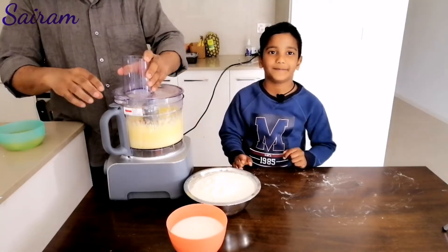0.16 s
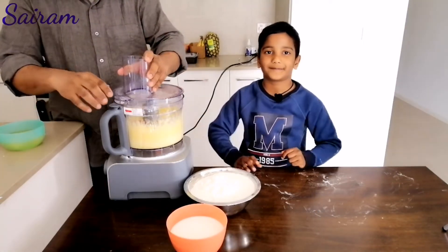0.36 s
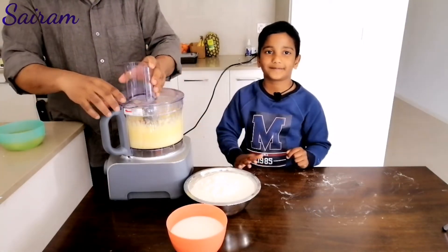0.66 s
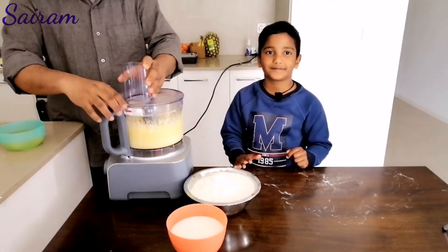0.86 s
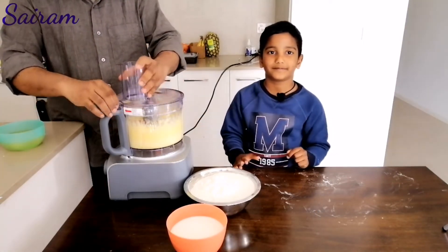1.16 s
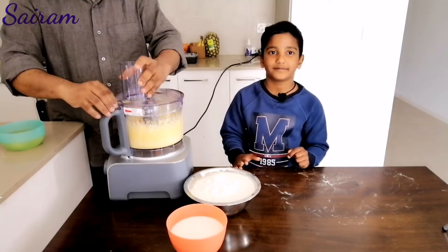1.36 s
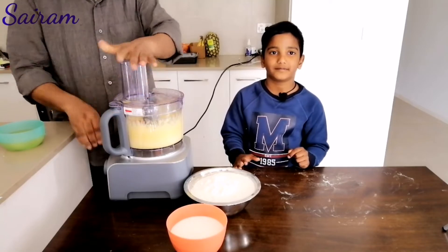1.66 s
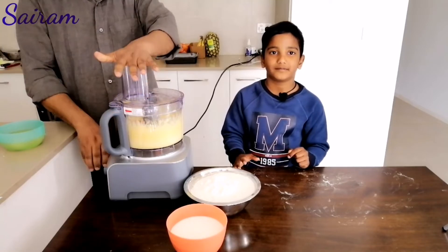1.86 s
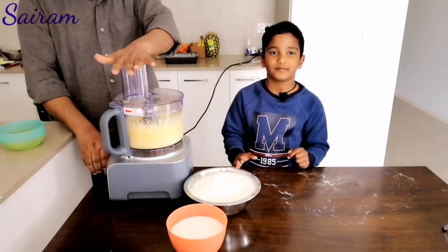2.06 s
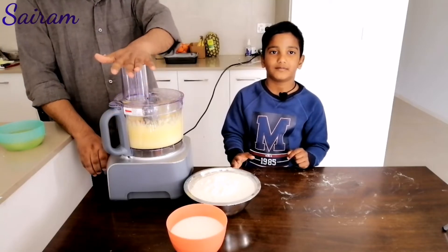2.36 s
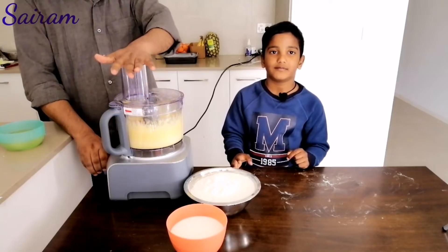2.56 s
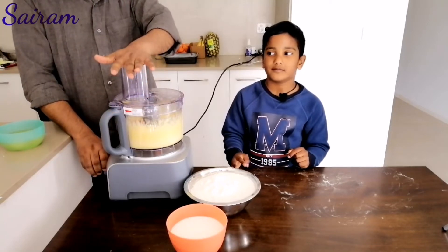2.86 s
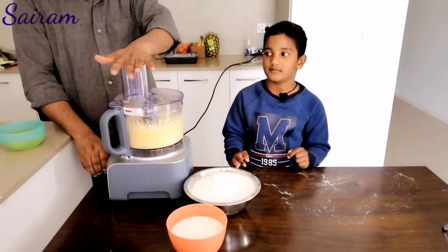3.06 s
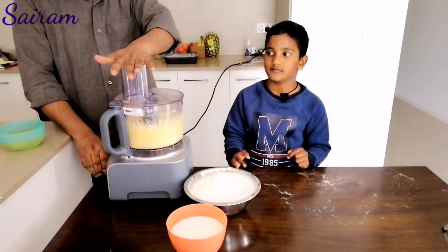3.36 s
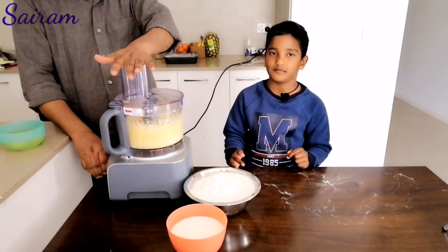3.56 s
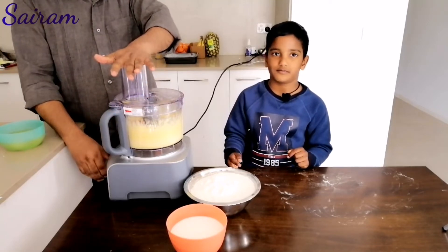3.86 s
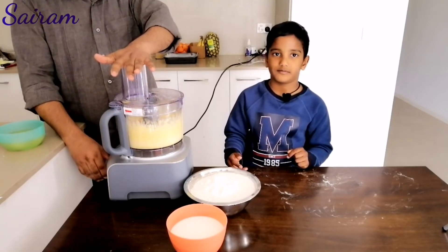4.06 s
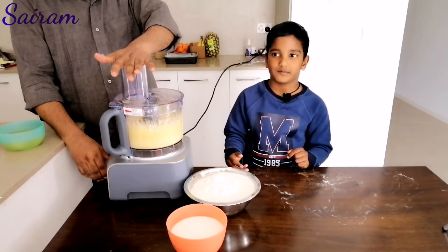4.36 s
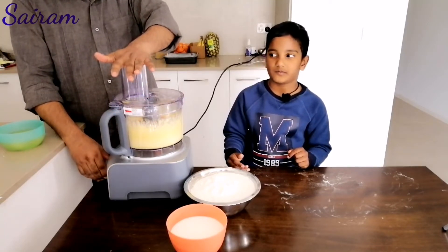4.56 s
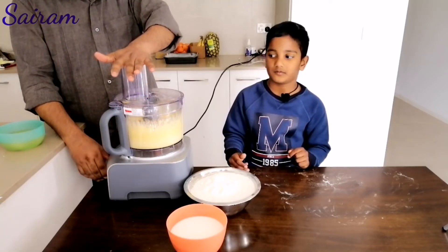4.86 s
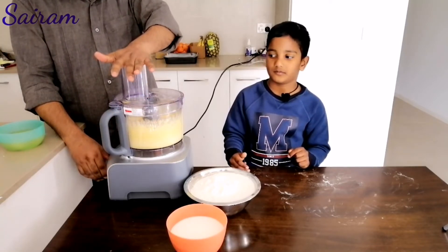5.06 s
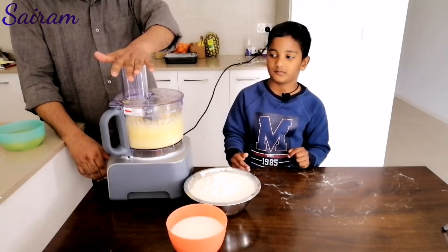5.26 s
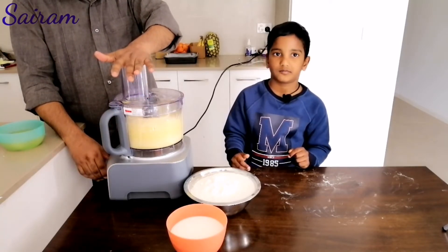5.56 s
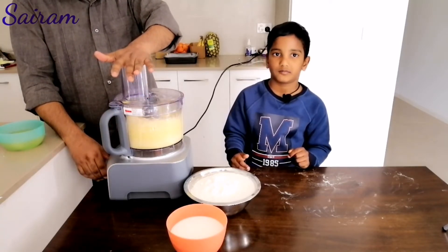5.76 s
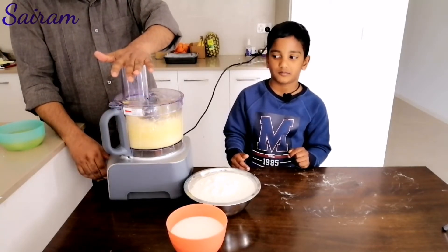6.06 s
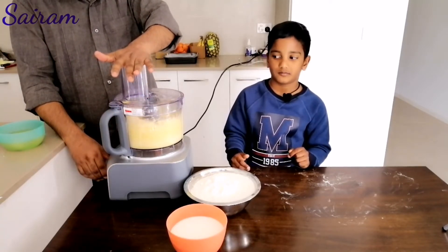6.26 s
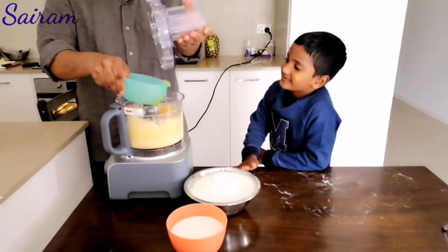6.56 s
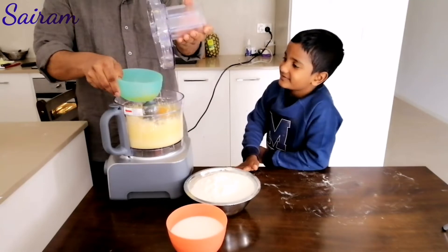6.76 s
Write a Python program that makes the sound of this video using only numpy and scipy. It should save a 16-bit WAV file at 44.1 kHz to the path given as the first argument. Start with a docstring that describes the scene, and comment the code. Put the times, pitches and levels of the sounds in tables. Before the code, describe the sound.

Hollow plastic clatters and clacks as a lid is seated, a switch clicks, and an electric mixer motor climbs to a rushing whine, drops quieter, then cuts off.

```python
"""In a quiet, hard-walled kitchen the plastic lid of a food processor is seated and twisted until it locks:
random slips make it scrape, and short chatters make it knock and ring.
A switch clicks and the motor runs up. One turning shaft sets the whine of its five-blade cooling fan, the
whir and the rattle of the drive; shaped noise makes the rush of air and batter, the hiss and the rumble.
Late on the whole sound turns quieter, then stops dead, leaving a very faint low drone."""
import sys
import numpy as np
from scipy import signal
from scipy.fft import rfft, irfft
from scipy.io import wavfile
from scipy.ndimage import uniform_filter1d

SR = 44100
rng = np.random.default_rng(int(sys.argv[2]) if len(sys.argv) > 2 else 0)


def to_wav(s):
    """Save 16-bit WAV."""
    ch = np.atleast_2d(s).T  # columns
    pcm = np.round(np.clip(ch, -1, 1) * 32767)  # PCM
    wavfile.write(sys.argv[1], SR, pcm.astype(np.int16))


N = 305436
TIME = np.arange(N) / SR
MOTOR_ON_S, STOP_S = 3.68, 6.458
FAN_BLADES = 5
FULL_HZ = 950  # fan blades passing per second at full speed, before the late sag

# Ringing of lid and bowl. Each row: frequency in Hz, width in Hz, relative level in dB.
LID_RINGING = [(216, 95, 8), (270, 38, -7), (573, 170, -7), (700, 83, -8.5), (1036, 70, 7.5),
               (1215, 52, -1.5), (1632, 43, 1.5), (2070, 180, -5.5), (2410, 80, 0.5), (3090, 540, -14.5),
               (4400, 1500, -18), (5370, 670, -14.5), (7080, 220, -17.5), (10430, 3800, -13.5)]
# Resonances of bowl and housing under the running motor.
# Each row: frequency in Hz, width in Hz, relative level in dB.
HOUSING_RINGING = [(546, 21, -7), (740, 54, -4.5), (1042, 11, -9), (2200, 150, -8), (2710, 120, -23),
                   (3760, 110, 2.5), (5680, 150, -5), (6720, 200, -7.5)]


def undb(db):
    """Turn decibels into a gain."""
    return 10 ** (np.asarray(db) / 20)


def unit(x):
    """Scale to an rms (average strength) of 1."""
    return x / np.sqrt(np.mean(x ** 2) + 1e-20)


def ramp(start_s, length_s):
    """A straight rise from 0 to 1."""
    return np.clip((TIME - start_s) / length_s, 0, 1)


def on_log(hz, points):
    """Read values off (Hz, value) points joined along a logarithmic frequency axis."""
    point_hz, value = np.transpose(points)
    return np.interp(np.log(hz + 1), np.log(point_hz), value)


def colour(x, spectrum):
    """Filter x by (Hz, dB) points, falling steeply beyond both ends; rms 1."""
    hz = np.fft.rfftfreq(N, 1 / SR) + 1
    low_skirt = 1 / (1 + (spectrum[0][0] / hz) ** 12)
    high_skirt = 1 / (1 + (hz / spectrum[-1][0]) ** 24)
    gain = undb(on_log(hz, spectrum)) * low_skirt * high_skirt
    return unit(irfft(rfft(x) * gain, N))


def band(x, lo_hz, hi_hz, order=3):
    """Keep only the frequencies between two edges."""
    edges_hz = [lo_hz, min(hi_hz, .45 * SR)]
    return signal.sosfilt(signal.butter(order, edges_hz, "band", fs=SR, output="sos"), x)


def ring(x, modes):
    """Let x drive resonances, given as (Hz, width in Hz, dB), and add them up."""
    total = 0
    for hz, width, db in modes:
        total = total + undb(db) * signal.lfilter(*signal.iirpeak(hz, hz / width, SR), x)
    return total


def walk(rate):
    """A smooth random wander: levels held for 1 / rate seconds, then smoothed twice; spread near 1."""
    hold = int(SR / rate)
    steps = np.repeat(rng.standard_normal(N // hold + 1), hold)
    smooth = uniform_filter1d(uniform_filter1d(steps, hold), hold)
    return 1.3 * smooth[:N]


def grains(per_s, spread_db):
    """Random tiny impacts, a few much harder than the rest."""
    chance, size, push = rng.random(N), rng.exponential(size=N), rng.standard_normal(N)
    strength = undb(spread_db * np.minimum(size, 4))
    return (chance < per_s / SR) * np.sign(push) * strength


def pan(left_db):
    """Gains of left and right for a left-minus-right level in dB."""
    return undb(np.array([[.5], [-.5]]) * left_db)


def direct(x):
    """The straight path reaches the left side first, six samples before the right."""
    return np.array([x, np.r_[np.zeros(6), x[:-6]]])


def echoes(x):
    """The kitchen's diffuse ring: fading noise whose bass is nearly alike on both sides."""
    # How long the kitchen rings. Each row: frequency in Hz, time to fall by 60 dB in seconds.
    ring_times = [(150, 0.43), (600, .8), (2500, .75), (5500, 0.45), (11000, 0.3)]
    t, hz = TIME[:SR], np.fft.rfftfreq(SR, 1 / SR)
    alike = .92 * np.sinc(hz / 1600)
    mid, side = rfft(rng.standard_normal((2, SR)))
    field = mid * np.sqrt(1 + alike) + np.array([[1], [-1]]) * side * np.sqrt(1 - alike)
    # each frequency region fades at its own pace
    centres = np.geomspace(125, 16000, 8)
    tail = 0
    for centre, share in zip(centres, np.eye(len(centres))):
        part = irfft(field * on_log(hz, np.c_[centres, share]), SR)
        tail = tail + part * np.exp(-np.log(1000) * t / on_log(centre, ring_times))
    tail = tail * np.clip((t - .003) / 0.0044, 0, 1)  # the echoes begin after 3 ms
    return signal.fftconvolve(x[None], unit(tail) / np.sqrt(SR), axes=1)[:, :N]


def room(x, wet_db):
    """Direct sound plus echoes, at the same overall power."""
    return (direct(x) + undb(wet_db) * echoes(x)) / np.hypot(1, undb(wet_db))


def kitchen():
    """Faint room noise over a low drone that is stronger at first; both are filtered noise."""
    # The quiet kitchen. Each row: frequency in Hz, relative level in dB per Hz.
    room_noise = [(53, -33.5), (90, -4), (138, -2), (175, -7), (292, -10), (362, -12.5), (605, -13),
                  (834, -18.5), (969, -20), (10200, -34), (15000, -36.5)]
    drone_spectrum = [(22, -8), (45, -14.5), (55, 0), (63, -2.0), (72, -7), (95, -16.0)]
    noise = colour(room(rng.standard_normal(N), wet_db=13.5), room_noise)
    drone = colour(room(rng.standard_normal(N), wet_db=0), drone_spectrum)
    drone_db = np.interp(TIME, [1.2, 1.8], [-56, -63])
    return undb(-62.2) * noise + undb(drone_db) * drone


def slide():
    """The lid sticks and slips along the rim; under pressure the bowl groans and the scrape turns duller."""
    # Pushes that slide the lid along the rim. Each row: start in seconds, length in seconds,
    # level in dB, groan of the bowl in dB against that level.
    pushes = [(-0.05, 0.57, -60, -7), (0.479, 0.06, -52, -5), (0.538, 0.13, -39.5, -1),
              (0.679, 0.11, -36, 4), (0.907, 0.07, -51, -8.5), (1.151, 0.22, -43, -5)]
    attack_s, release_s = 0.02, 0.03
    slips = grains(per_s=1100, spread_db=3)
    rung = ring(slips, LID_RINGING) + undb(-15.5) * slips
    groan = unit(band(rung, 150, 400))
    rub = unit(band(rung, 450, 1500))
    scratch = unit(band(rung, 1800, 12000))
    scrape = 0
    for start_s, length_s, level_db, groan_db in pushes:
        release = np.exp(-np.maximum(TIME - start_s - length_s, 0) / release_s)
        push = ramp(start_s, attack_s) * release
        mix = rub + undb(-2.5 - .7 * groan_db) * scratch + undb(groan_db) * groan
        scrape = scrape + undb(level_db) * push * mix
    return room(scrape, wet_db=-2.5)


def knocks():
    """Short chatters of plastic on plastic: soft ones thud the bowl and ring the lid, hard ones clack."""
    # Knocks of lid, latch and switch. Each row: start in seconds, level in dB, hardness in dB,
    # click against the level in dB, length of the chatter in seconds.
    knock_list = [(0.014, -42.5, 4, -3, 0.014), (0.12, -43.5, 4, -1.5, 0.007), (0.186, -40, 9, -3, 0.0084),
                  (0.384, -49.5, 12, -2, 0.0081), (0.485, -45.5, -2.5, -5, 0.04),
                  (0.544, -30.5, 11.5, -4, 0.013), (0.569, -34, -0.5, 5.5, 0.016),
                  (0.641, -19, -1.5, -15, 0.013), (0.66, -35.5, -6, 4.5, 0.0092),
                  (0.696, -33, -8, -15, 0.016), (0.729, -28.5, -3, -16.5, 0.013), (0.753, -39, 1, 6, 0.009),
                  (0.771, -33, -11, -13, 0.018), (0.932, -40.5, 7, 2, 0.016),
                  (0.957, -42.5, -8, -1.5, 0.014), (1.032, -24.5, -2, -9.5, 0.0098),
                  (1.149, -36.5, 2.5, -2.5, 0.0097), (1.242, -22.5, -7.5, -8, 0.014),
                  (1.249, -16.5, 2, -11.5, 0.012), (2.038, -64.5, -14, -12, 0.011),
                  (3.63, -46.5, 8, -4, 0.0066), (3.681, -42, -10, -16, 0.016),
                  (3.703, -39, -3.5, -7, 0.0085)]
    # Frequencies in Hz that bound thud, ring, clack and click.
    edges_hz = [160, 440, 1850, 4000, 12300]
    thud_db, room_db = -5.5, -3
    bounce_spread_db = 2  # how much the bounces within one chatter differ in strength
    out, t = np.zeros(N + SR), TIME[:SR // 4]
    for start_s, level_db, hard_db, click_db, length_s in knock_list:
        strength = undb(bounce_spread_db * rng.standard_normal(len(t)))
        bounces = rng.standard_normal(len(t)) * strength
        contact = bounces * np.exp(-(t / max(length_s, .002)) ** 4)
        rung = ring(contact, LID_RINGING) + undb(-12) * contact
        shape_db = [thud_db - hard_db, -hard_db / 2, hard_db / 2, click_db]
        for lo_hz, hi_hz, db in zip(edges_hz, edges_hz[1:], shape_db):
            part = band(rung, lo_hz, hi_hz)
            loudest = np.sqrt(uniform_filter1d(part ** 2, SR // 100).max())  # rms of the loudest 10 ms
            out[int(start_s * SR):][:len(t)] += undb(level_db + db) * part / loudest
    return direct(out[:N]) + undb(room_db) * echoes(out[:N])


def blade_rate(running_s):
    """Blades per second: the motor kicks off, climbs steadily, levels out and later sags a little."""
    start_hz, climb_hz_per_s = 574, 339  # the quick kick leads up to this steady climb
    kick_hz, kick_s, knee_hz = 115, 0.15, 9
    kick = kick_hz * np.exp(-(running_s / kick_s) ** 3)
    climb = start_hz + climb_hz_per_s * running_s - kick
    # a rounded knee joins the climb to full speed
    levelled = FULL_HZ - knee_hz * np.logaddexp(0, (FULL_HZ - climb) / knee_hz)
    sag_hz = 8 * ramp(5.95, 0.25)  # the speed sags under the batter
    return levelled - sag_hz


def shaft_angle(blade_hz):
    """Turning angle of the shaft, which the batter loads unevenly."""
    wobble = 1 + 0.00028 * walk(25) + 0.0022 * walk(4)
    return 2 * np.pi * np.cumsum(blade_hz * wobble) / SR / FAN_BLADES


def fan_whine(shaft, blade_hz, running_s):
    """The blade note grows with speed and swells at each resonance that it sweeps through."""
    # Resonances met by the note. Each row: frequency in Hz, width in Hz, level in dB,
    # left minus right in dB.
    sweep_modes = [(643.6, 18, -18.5, 2), (710, 46, -16.5, 3.5), (751, 27, -15.5, -5), (800, 40, -31, 6)]
    full_db, growth_db = -27.5, 35.5  # level at full speed, growth per tenfold speed
    speed = blade_hz / FULL_HZ
    # unsettled air shakes the note in level and phase: fully (1) at the start, then settling
    flutter_start, flutter_steady, settle_s = 1, 0.084, 0.3
    unsettled = np.exp(-(running_s / settle_s) ** 2)
    flutter = np.clip(flutter_steady + (flutter_start - flutter_steady) * unsettled, 0, 1)
    eddies = (walk(130) + 1j * walk(130)) / np.sqrt(2)
    shaken = np.sqrt(1 - flutter ** 2) + flutter * eddies
    note = np.sqrt(2) * np.real(shaken * np.exp(1j * FAN_BLADES * shaft))
    # the note drifts from the left towards the right
    drift = pan(np.interp(TIME, [5.0, 5.4], [5, -2.5]))
    power = (undb(full_db + growth_db * np.log10(speed) + 1.1 * walk(6)) * drift) ** 2
    for hz, width, db, left_db in sweep_modes:
        power = power + (undb(db) * pan(left_db) / (1 + (2 * (blade_hz - hz) / width) ** 2)) ** 2
    # while the note climbs, its own echoes trail below it and beat against it
    trail = undb(np.interp(speed, [0.95, 1], [-10, -23]))
    return direct(note) * np.sqrt(power) + echoes(note * trail * np.sqrt(power.mean(axis=0)))


def drive_tones(shaft, speed):
    """Sine tones locked to the shaft; each wavers and reaches the two sides with its own phase."""
    # Tones of shaft, fan and drive. Each row: multiple of the shaft rate, relative level in dB.
    orders = [(3.68, -19.5), (3.94, -16), (5.51, -24.5), (5.7, -10), (6, -21.5), (9.95, -18.5), (10, -7.5),
              (10.6, -16.5), (10.78, -13.5), (11.06, -18), (11.74, -25), (12, -14.5), (14, -16.5),
              (14.82, -13.5), (15, -10), (16, -29.5), (18, -18.5), (20, -19), (30, -27)]
    tones = 0
    for multiple, db in orders:
        lead = np.array([[.5], [-.5]]) * min(multiple / 6, 1.3)
        # the fan's overtones come first, the others stand out at full speed
        growth = speed ** (3.2 if multiple % FAN_BLADES == 0 else 8.7)
        tone = np.sin(multiple * shaft + 0.43 * walk(14) + lead)
        tones = tones + growth * undb(db + 2.9 * walk(8.3)) * tone
    return undb(-23) * tones


def churning_air(shaft):
    """Noise chopped by the fan blades, plus a drive rattle that swells once a turn."""
    # How the rush divides between the sides. Each row: frequency in Hz, left minus right in dB.
    balance = [(60, -3), (110, -1), (200, -1), (380, 2), (700, -0.5), (1290, -4.5), (2380, 0), (4400, 2),
               (8120, -3.5), (15000, 5.5)]
    air = rng.standard_normal(N) * (1 + 0.46 * np.sin(FAN_BLADES * shaft))
    rattle = grains(per_s=3000, spread_db=1.0) * (1 + 1.1 * np.sin(shaft))
    unsteady = undb(.8 * walk(35) + .7 * walk(150))
    churn = room((unit(air) + undb(-9) * unit(rattle)) * unsteady, wet_db=3.0)
    # the vents blow unrelated air at the two sides
    churn = unit(churn) + undb(-2) * rng.standard_normal((2, N))
    left_db = on_log(np.fft.rfftfreq(N, 1 / SR), balance)
    return irfft(rfft(churn) * pan(left_db), N)


def air_rush(churn, decades):
    """Air and batter rush: the churn drives the housing and grows with speed."""
    # Tone colour of the rush. Each row: frequency in Hz, relative level in dB.
    rush_spectrum = [(250, -51), (430, -30), (540, -11.5), (646, -11), (720, -9), (836, -14.5), (932, -9),
                     (999, -7.5), (1110, -5.5), (1370, -12.5), (1940, -7.5), (2540, -9), (2800, -9),
                     (3030, -9.5), (4600, -29.5), (5980, -33.5), (10100, -120)]
    full_db, growth_db = -22.5, 40.5  # level at full speed, growth per tenfold speed
    rush = colour(churn + 0.74 * ring(churn, HOUSING_RINGING), rush_spectrum)
    return undb(full_db + growth_db * decades) * rush


def vent_hiss(churn, decades):
    """Air hisses at the vents: the treble of the churn, growing with speed."""
    # Tone colour of the hiss. Each row: frequency in Hz, relative level in dB per Hz.
    hiss_spectrum = [(2470, -23.5), (4200, -3.5), (5800, 0), (6260, -1.5), (7370, 0), (8360, -5),
                     (11000, -3.5), (11700, -8), (12700, -11.5), (14400, -16.5), (15500, -26.5)]
    full_db, growth_db = -31.5, 53.5  # level at full speed, growth per tenfold speed
    return undb(full_db + growth_db * decades) * colour(churn, hiss_spectrum)


def starting_strain(churn):
    """The starting torque shakes the low modes of the housing."""
    strain_db = np.interp(TIME, [3.68, 3.88, 4.5], [-38, -32, -50])
    return undb(strain_db) * unit(ring(churn, HOUSING_RINGING[:3]))


def base_rumble(shaft, decades):
    """Low noise, plus the shaft's imbalance swelling as it passes the resonance of the base."""
    # Low rumble of the base. Each row: frequency in Hz, relative level in dB per Hz.
    rumble_spectrum = [(110, -16), (145, 3.5), (195, -3.5), (240, 0), (310, 0.5), (410, -9), (480, -5),
                       (620, -30)]
    full_db, growth_db = -36, 37  # rumble level at full speed, growth of both per tenfold speed
    uneven = rng.standard_normal(N) * undb(1.5 * walk(20))
    rumble = colour(room(uneven, wet_db=0.5), rumble_spectrum)
    imbalance = ring(np.sin(shaft), [(150, 20, 1)])
    return undb(full_db + growth_db * decades) * (rumble + imbalance)


def mains_hum(shaft, speed):
    """Mains hum beats against the slow-turning drive; it is strongest under the starting current."""
    mains = 2 * np.pi * 50 * TIME
    slow_drive = undb(-14.5 + 2 * walk(5.5)) * np.sin(0.36 * shaft)
    hum = undb(-8.5) * np.sin(mains) + undb(-17) * np.sin(2 * mains) + slow_drive
    return undb(-37.5) * hum * pan(-4.5) / speed ** 0.6


def quieter(db):
    """Gain of the late drop in loudness."""
    return undb(db * ramp(5.7, 0.11))


def motor():
    """Fan, drive and air all follow one shaft; most of their levels grow with its speed."""
    running_s = np.maximum(TIME - MOTOR_ON_S, 0)
    blade_hz = blade_rate(running_s)
    speed = blade_hz / FULL_HZ
    decades = np.log10(speed)
    shaft = shaft_angle(blade_hz)
    airflow = 1 - np.exp(-(running_s / 0.1) ** 2)  # the air takes a moment to start moving
    churn = churning_air(shaft)
    whine = fan_whine(shaft, blade_hz, running_s)
    moving = whine + air_rush(churn, decades) + drive_tones(shaft, speed)
    middle = airflow * moving + starting_strain(churn)
    edges = airflow * vent_hiss(churn, decades) + base_rumble(shaft, decades) + mains_hum(shaft, speed)
    # in the late drop, bass and treble fall a little more than the rest
    return ramp(MOTOR_ON_S, 0.0043) * (middle + quieter(-2.5) * edges)


def scene():
    """Late on the whole sound turns quieter; then everything stops at once, leaving a very faint low drone."""
    drone_spectrum = [(25, -18), (55, -12.5), (72, -1.0), (100, -19), (600, -30), (12000, -47)]
    sounding = np.clip((STOP_S - TIME) / .006 + .5, 0, 1)
    sources = kitchen() + slide() + knocks() + motor()
    drone = undb(-75.5) * colour(rng.standard_normal(N), drone_spectrum)
    return sounding * quieter(-11) * sources + (1 - sounding) * drone


def record(dry):
    """Round the tallest peaks, dull the top octave and cut everything above it."""
    top_hz = 15000
    rounded = dry / (1 + (dry / .58) ** 4) ** .25
    hz = np.fft.rfftfreq(N, 1 / SR)
    dull = irfft(rfft(rounded) * undb(np.interp(hz, [11500, 12800], [0, -5])), N)
    return signal.sosfilt(signal.ellip(8, .2, 70, top_hz, fs=SR, output="sos"), dull)


dry = scene()
out = record(dry)
to_wav(out)
```